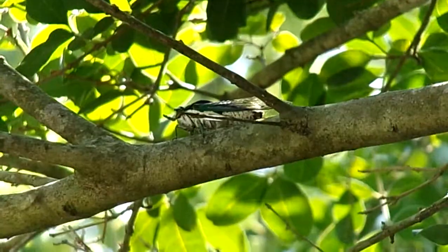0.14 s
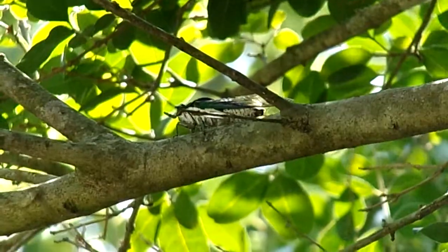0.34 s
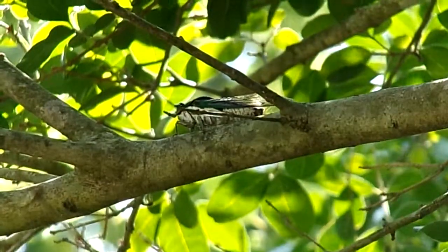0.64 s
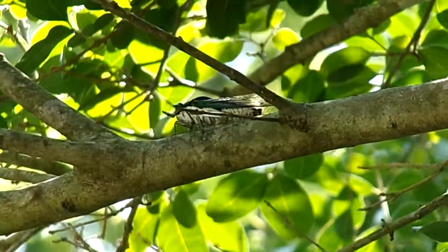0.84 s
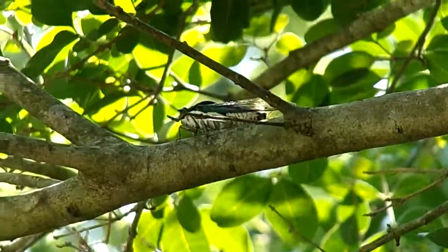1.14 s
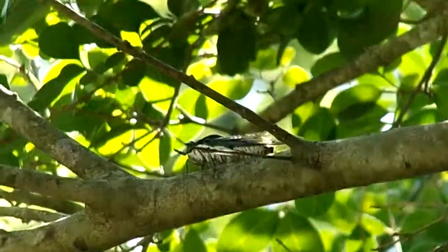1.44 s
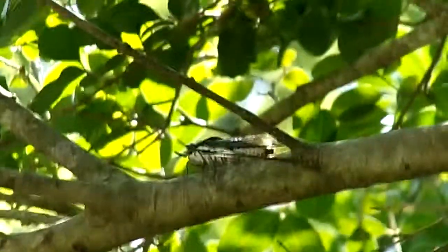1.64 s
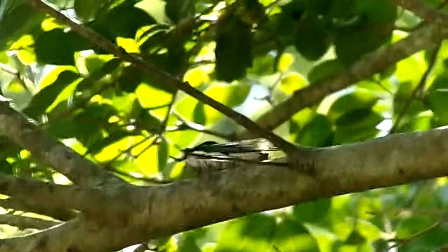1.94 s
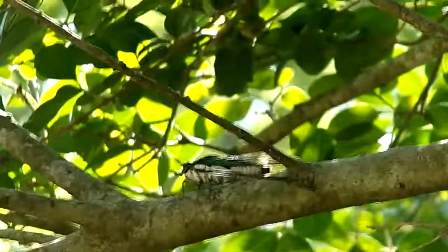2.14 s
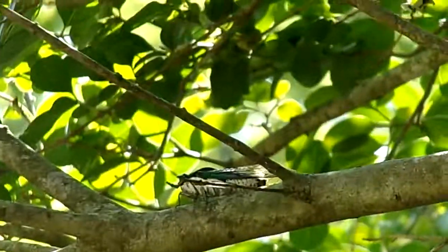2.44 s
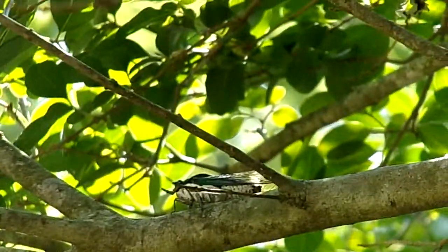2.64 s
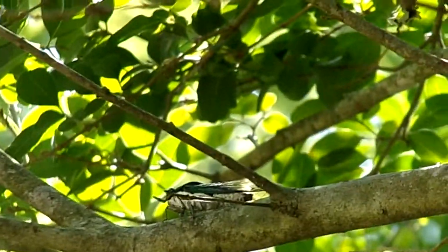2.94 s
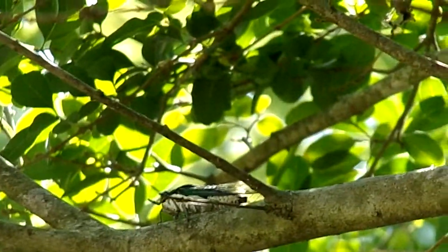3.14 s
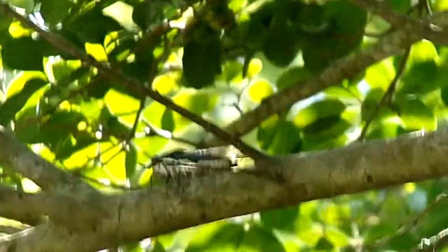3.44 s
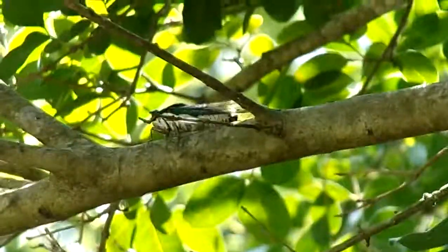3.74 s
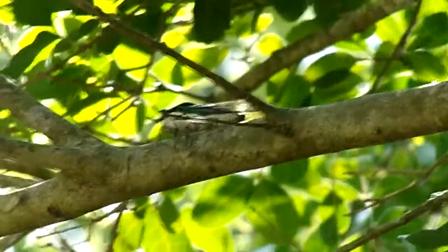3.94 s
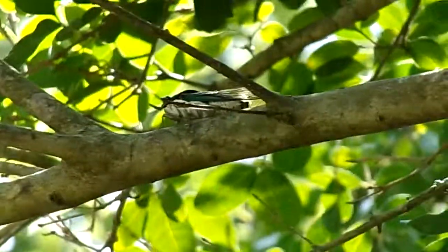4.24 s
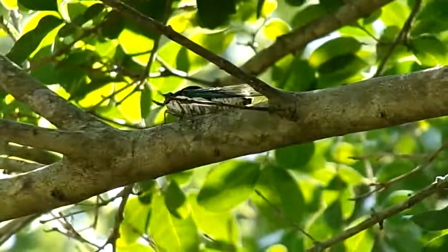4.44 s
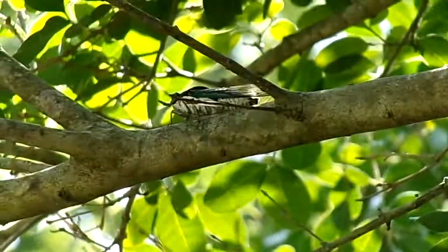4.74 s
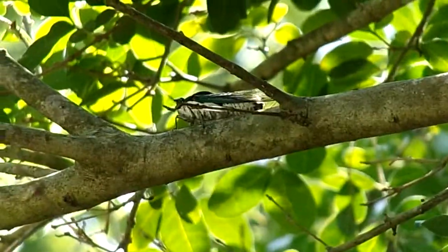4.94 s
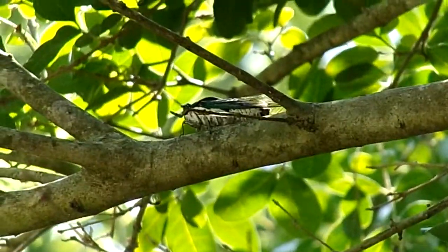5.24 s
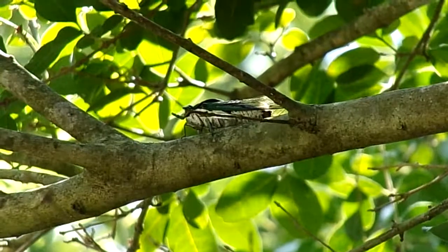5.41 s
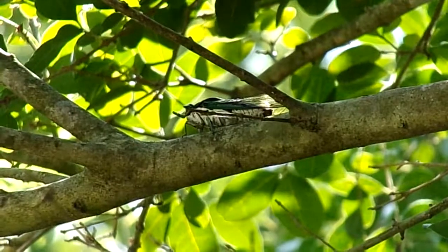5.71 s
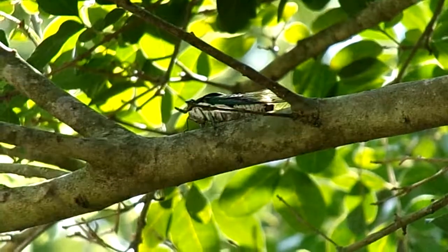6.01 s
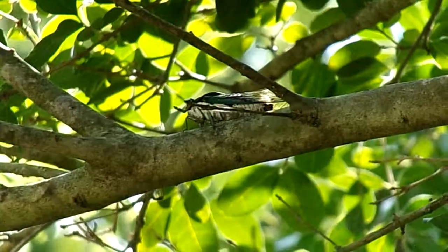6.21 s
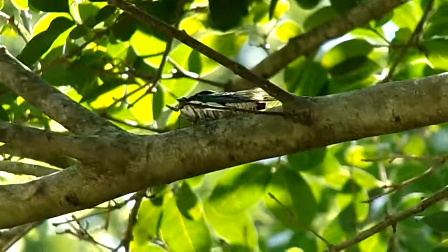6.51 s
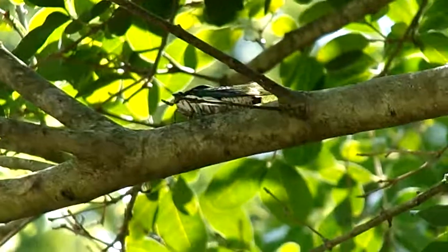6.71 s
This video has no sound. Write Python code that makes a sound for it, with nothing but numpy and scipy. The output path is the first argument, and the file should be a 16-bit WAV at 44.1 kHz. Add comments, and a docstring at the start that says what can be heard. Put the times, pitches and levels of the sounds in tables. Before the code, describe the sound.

Outdoors among trees, a close, dry cicada buzz dominates throughout. Strong pulsing throbs open it and give way after about two seconds to flutter that quickens in separate bouts as the song gradually eases, rising a little again at the end. Very high, soft insect chirps tick along underneath, a far bird gives a few blurred notes late, and remote traffic rumbles faintly.

```python
"""On a branch among trees, a cicada sings near a microphone while distant traffic murmurs.
Its tymbals, some 400 clicks a second, excite the resonances of the hollow abdomen.
The abdomen pumps in slow throbs, then in bouts of quicker flutter as the song eases and, late, swells a little.
Far cicadas add coloured noise; two high insects chirp and a far bird calls by resonances that follow a pitch path.
The traffic is coloured noise with faint hums and a whine."""
import sys
import numpy as np
from scipy import signal
from scipy.fft import rfft, irfft, next_fast_len
from scipy.io import wavfile
from scipy.ndimage import map_coordinates

SR = 44100
rng = np.random.default_rng(int(sys.argv[2]) if len(sys.argv) > 2 else 0)


def file_out(sig):
    """Save sig as 16-bit WAV at sys.argv[1]."""
    # one column per channel
    cols = np.atleast_2d(sig).T
    # limit, then scale
    lim = np.clip(cols, -1, 1)
    pcm = np.round(lim * 32767).astype(np.int16)
    wavfile.write(sys.argv[1], SR, pcm)


N = 302967
TIME = np.arange(N) / SR

# Event levels in the tables hold before the event's own envelope is applied.
# Traffic, broad spectrum: [f/Hz, relative level/dB]
TRAFFIC = [(12, -50), (20, -20), (85, -6), (124, -0.5), (219, 2), (343, -1.5), (560, -7.5), (702, -8.5),
           (816, -11.5), (897, -8.5), (1080, -8.5), (1410, -11.5), (1800, -14), (2340, 0.5), (3960, -120)]
# Hums within the traffic: [f/Hz, width/Hz, gain/dB]
HUMS = [(711, 85, 8), (898, 91, 3)]
# Far hum that climbs and grows: [t/s, f/Hz, level/dB]
RISING_HUM = [(0, 863, -83), (6.87, 945, -72)]
# Swells of a faint far whine: [middle t/s, length between 1/e points/s, level/dB]
WHINES = [(1.3, 0.17, -70.5), (2.67, 0.33, -73), (3.92, 0.6, -70.5), (6.358, 0.77, -73)]
# Notes of a far bird: [t/s, f/Hz, level/dB]
BIRD = [(4.66, 2030, -66), (4.8, 2000, -70.5), (4.88, 2070, -70), (4.96, 2040, -61.5), (5.31, 2060, -59)]
# Far chorus, broad spectrum: [f/Hz, relative level/dB]
CHORUS = [(1200, -63), (1750, -5), (2100, 2), (3000, 2), (5000, -1), (8500, -11), (10500, -7.5),
          (12500, -12.5), (15800, -19)]
# Even runs of chirps from two high insects: [first t/s, last t/s, number of chirps, f/Hz, level/dB]
CHIRP_RUNS = [(.13, 2.4, 12, 9230, -61.5), (2.545, 3.46, 7, 9230, -62), (3.65, 4.53, 5, 9230, -61.8),
              (4.71, 5.25, 5, 9240, -61.3), (5.42, 6.81, 8, 9280, -61.3), (3.03, 6.29, 17, 9880, -67),
              (6.44, 6.8, 3, 9900, -66)]
# Main resonance of the cicada's abdomen: [f/Hz, relative level/dB]
ABDOMEN = [(2500, -35), (3500, -9), (3950, 0), (4500, -1), (5000, -1.5), (5400, -3.5), (5800, -11),
           (6300, -24), (9000, -65)]
# Overtone band of the tymbals: [f/Hz, relative level/dB]
OVERTONE = [(4500, -63), (5700, -2), (6400, -0.5), (6750, 1), (7300, 0.5), (7700, -8), (8300, -14),
            (10000, -15.5), (11300, -20.5), (12500, -20), (15800, -32)]
# Rasping band below the main resonance and across it: [f/Hz, relative level/dB]
RASP = [(1000, -75), (1750, -31), (2050, -20.5), (2450, -5), (2900, -0.5), (3150, 0), (3500, -1),
        (3900, -5), (4600, -3), (7000, -34.5)]
# Narrow peaks and hollows on the cicada's bands, those from 6.3 to 7.6 kHz close-set like a comb: [f/Hz,
# width/Hz, gain over the broad spectrum/dB]
RINGS = [(2891, 45, 5), (3320, 25, 3), (3397, 28, 5), (4025, 40, 2), (4180, 50, -3), (4275, 70, 3),
         (4510, 25, -5), (4577, 28, 6), (4828, 22, 5), (4924, 30, 3), (5337, 30, 6), (6362, 20, 5),
         (6437, 25, 10), (6607, 20, 5), (6801, 20, 6), (7050, 25, 6), (7141, 20, 5), (7250, 40, 5),
         (7392, 20, 6), (7540, 20, 6)]
# Abdomen stretched taut for a burst: [f/Hz, relative level/dB]
TAUT = [(2000, -37), (3000, -16), (3900, -8.5), (4350, -1.5), (4800, -3), (5250, -17), (6000, -17.5),
        (7500, -45), (9000, -42)]
# Effort of the song, compared with FULL_EFFORT_DB: [t/s, level/dB]
EFFORT = [(0.06, -45.5), (0.6, -45.5), (1.64, -46), (3.0, -51), (3.07, -50.5), (3.11, -52.5), (3.58, -52),
          (5.46, -57), (6.18, -56), (6.56, -57.5), (6.82, -55.5)]
# Pace of the slow throbs that open the song: [t/s, pump rate/Hz]
THROB_PACE = [(0, 14.03), (1.2, 13.08), (1.7, 14.29), (2.25, 17.4)]
# Slide of a resonance in a throb: [t after the pump's peak/s, f/Hz]
THROB_SLIDE = [(-.052, 5380), (-.0225, 5240), (-.003, 4440), (.015, 4150)]
# Nearly pure rings of a slow pump: [f/Hz, level relative to the throb/dB, t of its peak after the pump's/s]
THROB_RINGS = [(4276, -2.5, 0.00051), (4600, -8.5, -0.0039), (5380, -12.5, -0.0032), (2886, -20, 0.018)]
# Bouts of quick flutter: [start t/s, end t/s, first pump rate/Hz, last pump rate/Hz, level when fully risen/dB]
FLUTTERS = [(2.23, 2.95, 17.4, 11.6, -47), (3.203, 4.6, 26.45, 27.8, -50.3), (5.456, 6.23, 49.8, 54.4, -47),
            (6.595, 6.87, 41, 44, -44)]
# Notches of the microphone: [f/Hz, width/Hz]
NOTCHES = [(3700, 130), (7880, 260), (8090, 200), (11720, 520)]

TOP_HZ = 15750  # band limit of the microphone

# A chirp's half length is a share of the beat, so quick runs have short chirps.
CHIRP_HALF_SHARE, CHIRP_SCATTER_DB, CHIRP_SCATTER_HZ = 0.36, 0.9, 25
# The pitch arches, its ends this far below the middle, and sags steadily besides.
CHIRP_ARCH_HZ, CHIRP_SAG_HZ_PER_S = 220, 1000

# Each band at full effort, and the dB it loses for each dB of easing (the overtone loses 1).
FULL_EFFORT_DB = -45
BODY_DB, BODY_FOLLOWS = -38, 0.83
RASP_DB, RASP_FOLLOWS = -42.5, 0.51
OVERTONE_DB = -44.5
# Tymbal click rate at full effort, and its slowing for each dB of easing.
CLICKS_PER_S, CLICKS_PER_DB = 440, 6.5
# The song catches once: a brief dip, then a push; its extremes are 0.86 of CATCH_DB.
CATCH_S, CATCH_WIDTH_S, CATCH_DB = 1.8, 0.025, 2.5
# A throb's reference level at full effort, its scatter, and the change of the body band while throbbing.
THROB_DB, THROB_SCATTER_DB, THROB_DUCK_DB = -38.5, 0.5, -1.3
# A flutter bout swells slowly and stops quickly.
FLUTTER_RISE_S, FLUTTER_RELEASE_S = 0.42, 0.064


def amp(db):
    """Amplitude ratio from decibels: 20 dB is a factor of ten."""
    return 10 ** (np.asarray(db) / 20)


def unit(x):
    """Normalization: scale to rms 1."""
    return x / np.sqrt(np.mean(x ** 2) + 1e-20)


def curves(rows):
    """Linear interpolation in time: one curve for each column after t."""
    t, *columns = np.transpose(rows)
    return [np.interp(TIME, t, column) for column in columns]


def wobble(rate):
    """Random modulation: a smooth curve through random knots, rate of them a second."""
    knots = rng.standard_normal(int(N * rate / SR) + 4)
    return map_coordinates(knots, [TIME * rate])


def swell(t, half):
    """Gaussian envelope: a rounded rise and fall, at 1/e when t = half from its centre."""
    return np.exp(-(t / half) ** 2)


def noise():
    """White noise: equal mean power at all frequencies."""
    return rng.standard_normal(N)


def filtered(x, response):
    """Linear filtering: the spectrum of x is multiplied by a frequency response."""
    size = next_fast_len(N + SR // 2)
    f = np.fft.rfftfreq(size, 1 / SR)
    return irfft(rfft(x, size) * response(f), size)[:N]


def resonance(f, hz, width):
    """Damped oscillator: causal response of one mode, 1 at its own frequency."""
    return 1j * f * width / (hz * hz - f * f + 1j * f * width)


def coloured(x, spectrum, peaks=()):
    """Spectral shaping: a broad spectrum with narrow peaks or dips on top, at rms 1."""
    hz, db = np.transpose(spectrum)

    def response(f):
        broad_db = np.interp(np.log(f + 1), np.log(hz), db)
        narrow_db = sum(gain / (1 + (2 * (f - centre) / width) ** 2) for centre, width, gain in peaks)
        return amp(broad_db + narrow_db)

    return unit(filtered(x, response))


def gliding(drive, s, hz, width):
    """Tracking resonance: drive from time s is shifted down by the path hz, low-passed and shifted back."""
    excerpt = np.take(drive, round(s * SR) + np.arange(len(hz)), mode="wrap")
    turn = np.exp(2j * np.pi * np.cumsum(hz) / SR)
    b, a = signal.butter(2, width / SR)
    return unit((signal.lfilter(b, a, excerpt / turn) * turn).real)


def add(track, s, burst):
    """Superposition: mix a short burst into the track, centred on time s."""
    at = round(s * SR) - len(burst) // 2 + np.arange(len(burst))
    inside = (at >= 0) & (at < N)
    track[at[inside]] += burst[inside]


def clicks(rate, jitter, scatter_db):
    """Impulse train of buckling ribs, uneven in time (jitter in periods) and in strength."""
    at = np.flatnonzero(np.diff(np.floor(np.cumsum(rate) / SR)))
    chance = rng.standard_normal((len(at), 2))
    late = jitter * chance[:, 0] * SR / rate[at]
    strength = amp(scatter_db * chance[:, 1])
    return unit(np.bincount(np.clip(at + late, 0, N - 1).astype(int), strength, N))


def foliage(x, t60, wet_db):
    """Diffuse scattering: swaying leaves give each click a short, ever new decaying tail."""
    t = np.arange(SR // 8) / SR
    decay = amp(-60 * t / t60) ** 2
    energy = np.abs(signal.fftconvolve(x ** 2, decay)[:N])
    return unit(x + amp(wet_db) * unit(np.sqrt(energy) * noise()))


def traffic():
    """Filtered noise: a far murmur with faint hums, one climbing, and a whine that comes and goes."""
    whine_level = sum(amp(db) * swell(TIME - s, length / 2) for s, length, db in WHINES)
    whine = gliding(noise(), 0, np.full(N, 1540.), width=46) * whine_level
    hum_hz, hum_db = curves(RISING_HUM)
    hum = gliding(noise(), 0, hum_hz, width=69) * amp(hum_db)
    murmur = coloured(noise(), TRAFFIC, HUMS) * amp(-57.5 + 0.8 * wobble(3.08))
    return murmur + whine + hum


def far_bird():
    """Narrow-band noise under a Gaussian envelope: a few soft, blurred notes just under the buzz."""
    out = np.zeros(N)
    t = np.arange(-(SR // 12), SR // 12) / SR
    envelope = np.exp(-0.5 * (t / 0.016) ** 2)
    for s, hz, db in BIRD:
        note = gliding(noise(), s, np.full(len(t), hz), width=150)
        add(out, s, amp(db) * envelope * note)
    return out


def chorus():
    """Incoherent summation: cicadas in far trees merge into a faint, nearly even hiss."""
    return coloured(noise(), CHORUS) * amp(-58.5 + 0.4 * wobble(3.8))


def high_insects():
    """Driven resonance: rasping clicks excite a gliding pitch, each insect on its own note and beat."""
    out = np.zeros(N)
    t = np.arange(-(SR // 7), SR // 7) / SR
    rasp = foliage(clicks(np.full(N, 200.), jitter=0.26, scatter_db=-0.2), t60=0.082, wet_db=0.5)
    for first, last, count, hz, db in CHIRP_RUNS:
        times, beat = np.linspace(first, last, count, retstep=True)
        shape = swell(t, CHIRP_HALF_SHARE * beat)
        # centring the arch keeps the energy-weighted mean pitch at hz
        arch = CHIRP_ARCH_HZ * (shape - np.average(shape, weights=shape ** 2))
        path = hz + arch - CHIRP_SAG_HZ_PER_S * t
        for s in times:
            sharp, loud = rng.standard_normal(2)
            note = gliding(rasp, s, path + CHIRP_SCATTER_HZ * sharp, width=360)
            add(out, s, amp(db + CHIRP_SCATTER_DB * loud) * shape * note)
    return out


def easing():
    """Common control: the song's effort relative to full effort, in dB (negative as it eases)."""
    return curves(EFFORT)[0] - FULL_EFFORT_DB


def tymbal():
    """Serial buckling: the rattle of one cicada's ribs, quicker with more effort."""
    rate = CLICKS_PER_S + CLICKS_PER_DB * easing()
    return clicks(rate * (1 + 0.06 * wobble(25)), jitter=0.14, scatter_db=0.0)


def throbs(rattle):
    """Moving resonance: in each slow pump it slides down while nearly pure rings swell and fade at set times."""
    out = np.zeros(N)
    t = np.arange(-(SR // 16), SR // 16) / SR
    pumps = np.cumsum(curves(THROB_PACE)[0] * (TIME < THROB_PACE[-1][0])) / SR
    times = TIME[np.flatnonzero(np.diff(np.floor(pumps)))]
    path = np.interp(t, *np.transpose(THROB_SLIDE))
    sliding = amp(-7.0) * swell(t + 0.017, 0.019)
    rings = []
    for ring_hz, _, _ in THROB_RINGS:
        phase = 2 * np.pi * np.cumsum(ring_hz + 30 * wobble(260)) / SR
        rings.append(unit(np.sin(phase)))
    levels_db = THROB_DB + THROB_SCATTER_DB * rng.standard_normal(len(times))
    for s, db in zip(times, levels_db):
        add(out, s, amp(db) * sliding * gliding(rattle, s, path, width=450))
        for ring, (_, ring_db, late) in zip(rings, THROB_RINGS):
            held = np.take(ring, round(s * SR) + np.arange(len(t)), mode="wrap")
            add(out, s, amp(db + ring_db) * held * swell(t - late, 0.02))
    return out


def flutter():
    """Amplitude modulation: in each bout quick pumps let a few crisp clicks ring the taut abdomen."""
    opening, level = np.zeros(N), np.zeros(N)
    for start, end, first, last, db in FLUTTERS:
        rise = np.clip((TIME - start) / FLUTTER_RISE_S, 0, 1)
        release = np.clip(1 - (TIME - end) / FLUTTER_RELEASE_S, 0, 1)
        bout = amp(db) * rise * release
        pumps = np.cumsum(np.interp(TIME, [start, end], [first, last], left=0)) / SR
        opening += bout * np.sin(np.pi * pumps) ** 4
        level += bout
    bursts = coloured(foliage(tymbal() * opening, t60=0.025, wet_db=-14), TAUT)
    return bursts * np.sqrt(np.mean(level ** 2))


def cicadas():
    """Source and filter: tymbals sizzle in three bands under one effort; throbs and flutter stand out."""
    ease_db = easing()
    near = foliage(tymbal(), t60=0.024, wet_db=-2.0)
    other = foliage(tymbal(), t60=0.078, wet_db=-3)
    since = TIME - CATCH_S
    catch_db = CATCH_DB * 2 * since / CATCH_WIDTH_S * swell(since, CATCH_WIDTH_S)
    # the duck fades out over 0.3 s once the throbs end
    duck_db = THROB_DUCK_DB * np.clip(1 - (TIME - THROB_PACE[-1][0]) / 0.3, 0, 1)
    body = coloured(near + amp(2.0) * noise(), ABDOMEN, RINGS)
    body *= amp(BODY_DB + BODY_FOLLOWS * ease_db + duck_db)
    overtone = coloured(near + 0.52 * other + amp(13.5) * noise(), OVERTONE, RINGS)
    overtone *= amp(OVERTONE_DB + ease_db)
    rasp = coloured(other + amp(7.5) * noise(), RASP, RINGS)
    rasp *= amp(RASP_DB + RASP_FOLLOWS * ease_db)
    slow = throbs(near + noise()) * amp(ease_db)
    return (body + rasp + slow) * amp(catch_db) + overtone + flutter()


def scene():
    """Superposition: the pressures of all sources add at one microphone, sent to two equal channels."""
    mono = traffic() + far_bird() + chorus() + high_insects() + cicadas()
    return np.array([mono, mono])


def record(dry):
    """Band limitation: the microphone cuts a few narrow notches and everything from TOP_HZ up."""
    def microphone(f):
        notches = [1 - resonance(f, hz, width) for hz, width in NOTCHES]
        return np.prod(notches, axis=0) * (f < TOP_HZ)

    return np.array([filtered(channel, microphone) for channel in dry])


dry = scene()
out = record(dry)
file_out(out)
```